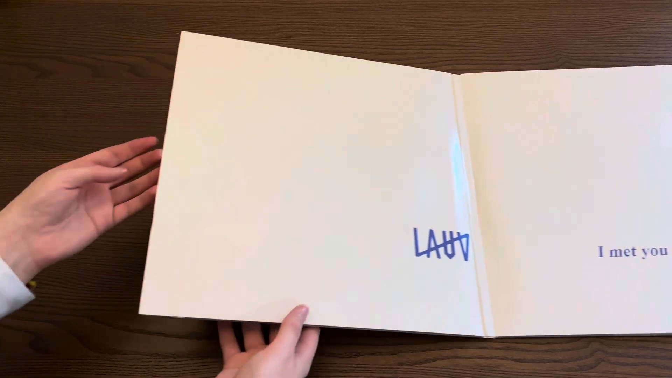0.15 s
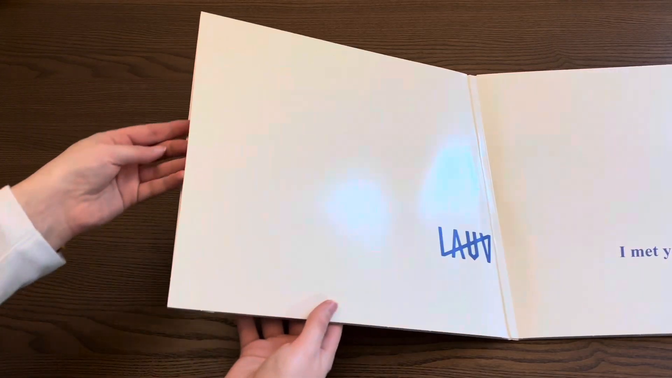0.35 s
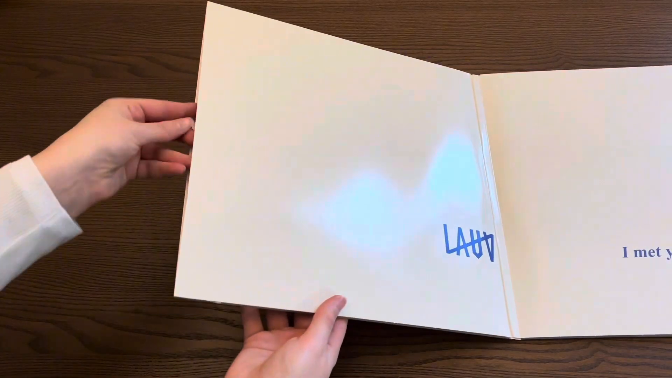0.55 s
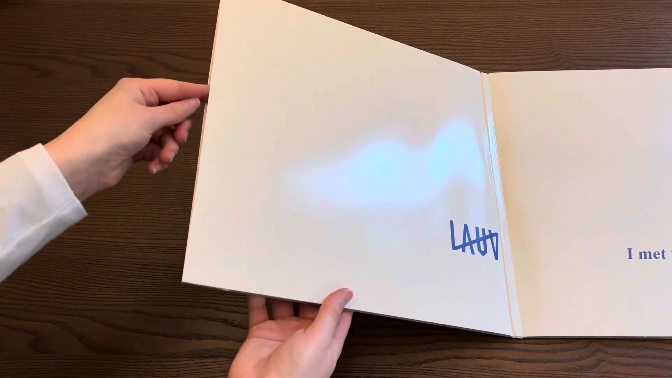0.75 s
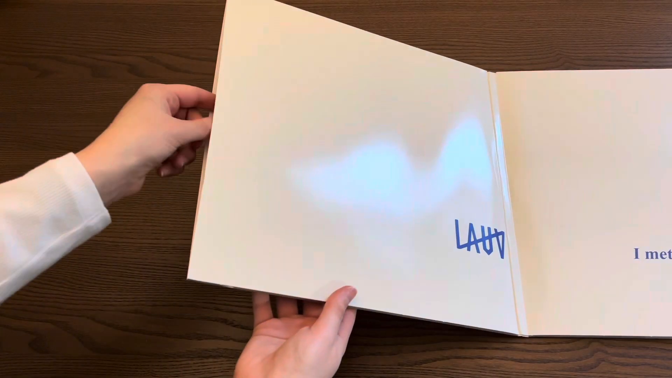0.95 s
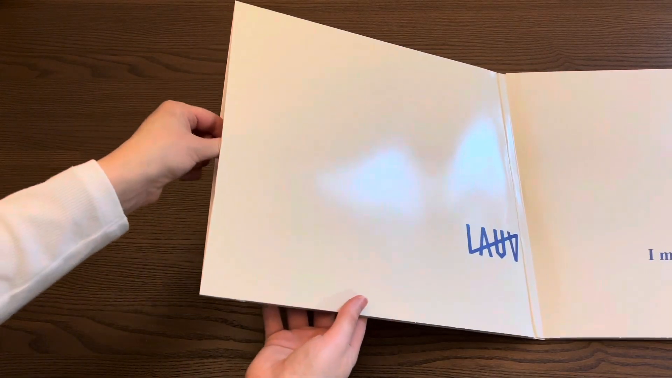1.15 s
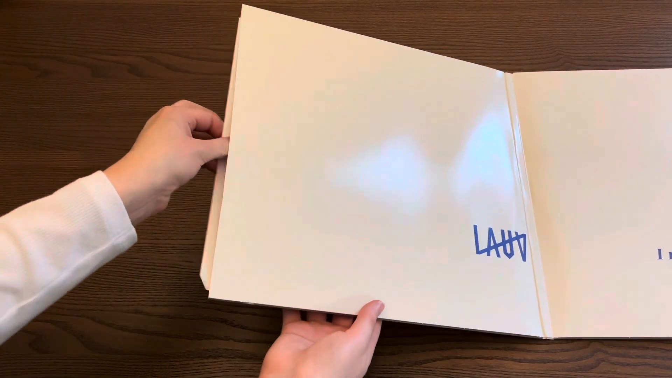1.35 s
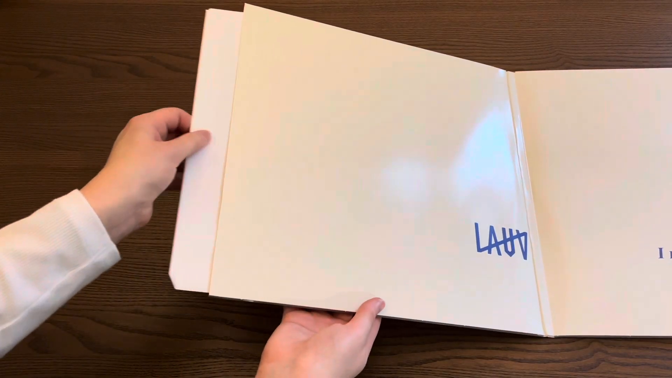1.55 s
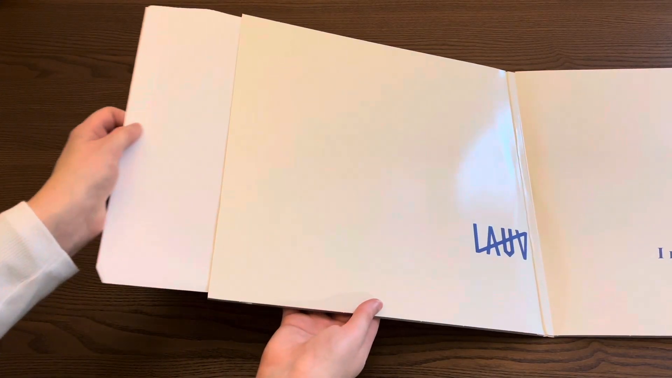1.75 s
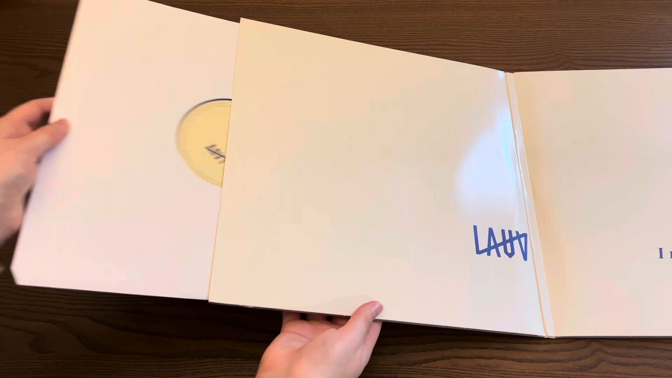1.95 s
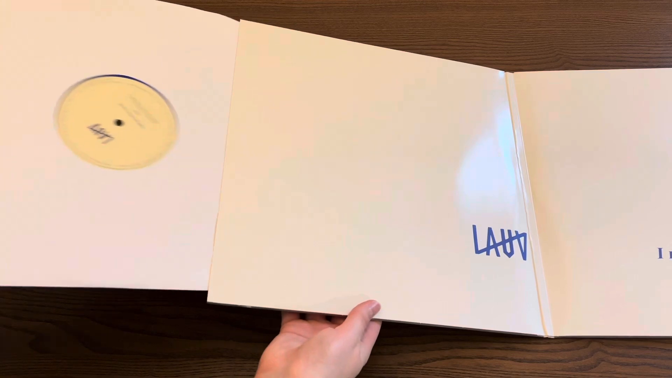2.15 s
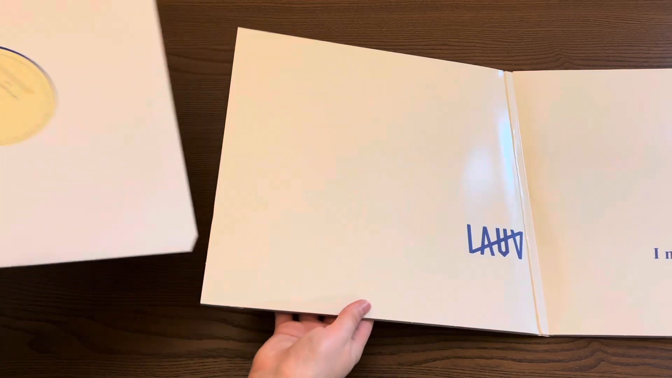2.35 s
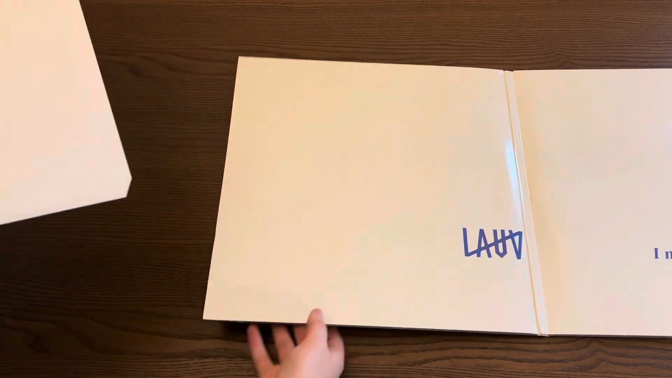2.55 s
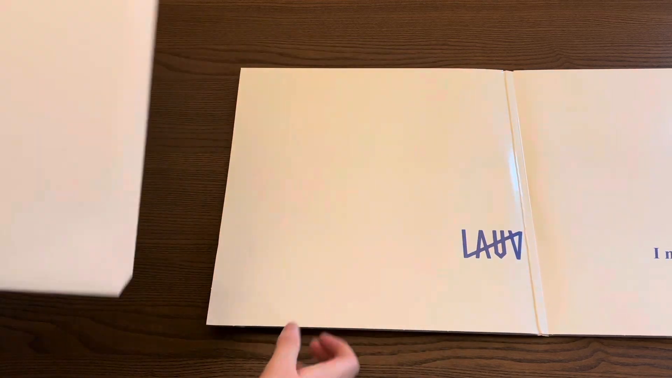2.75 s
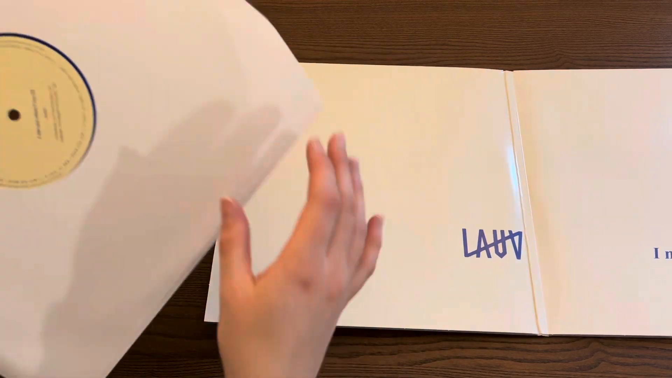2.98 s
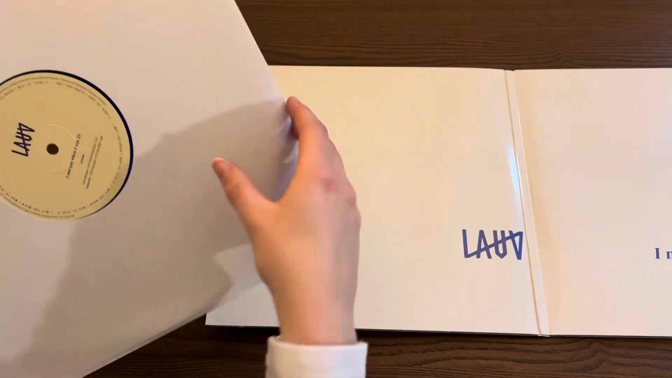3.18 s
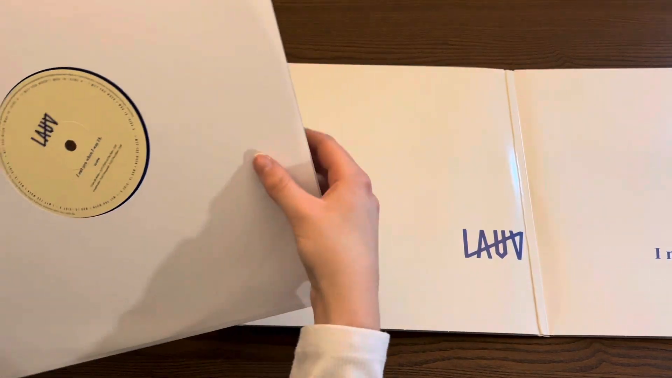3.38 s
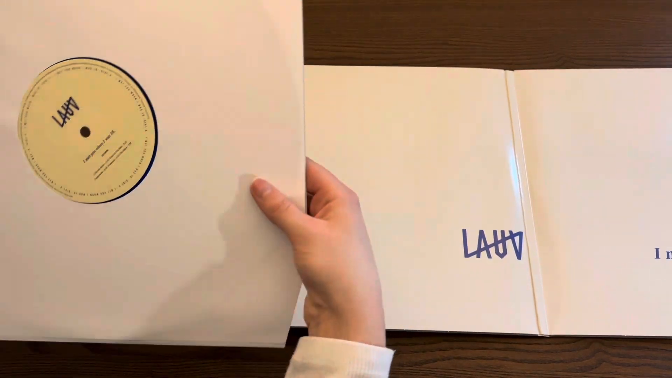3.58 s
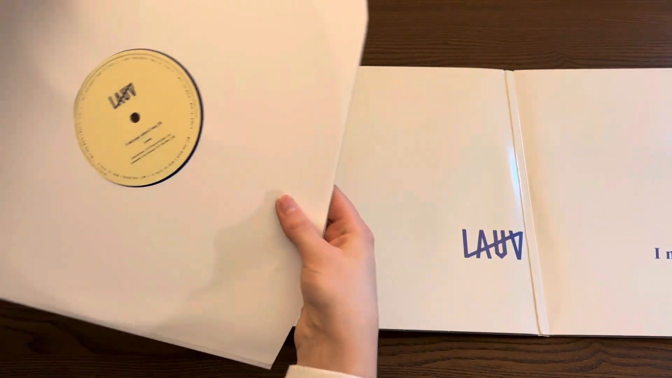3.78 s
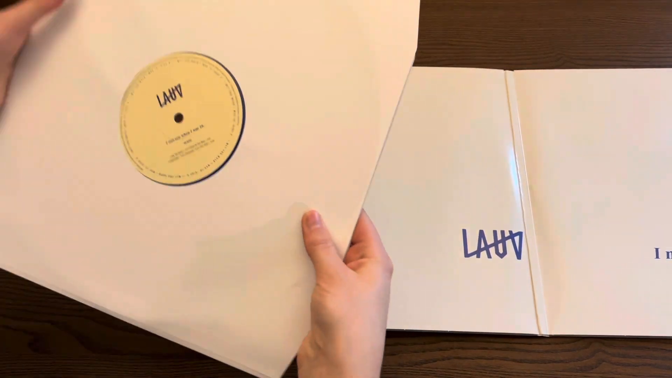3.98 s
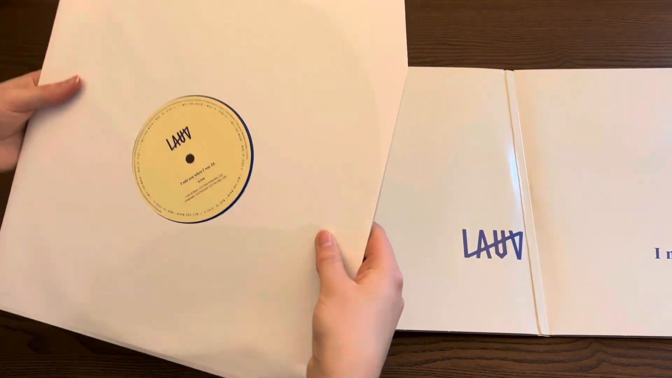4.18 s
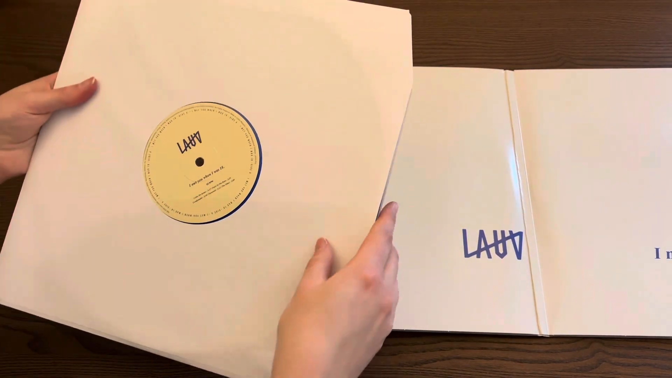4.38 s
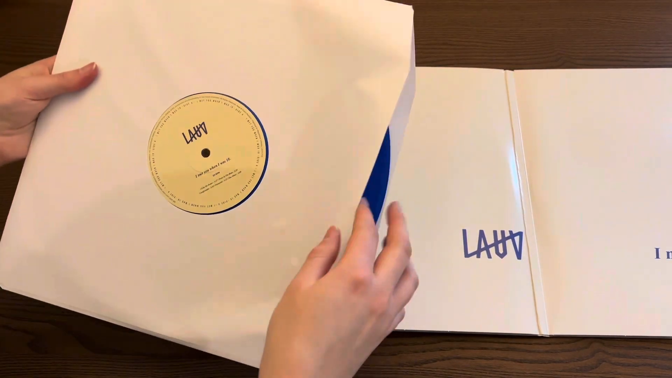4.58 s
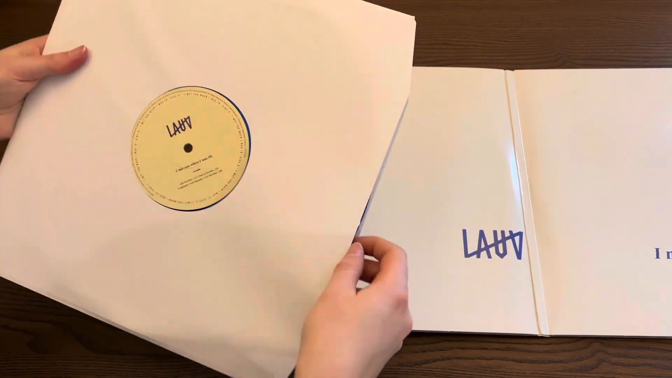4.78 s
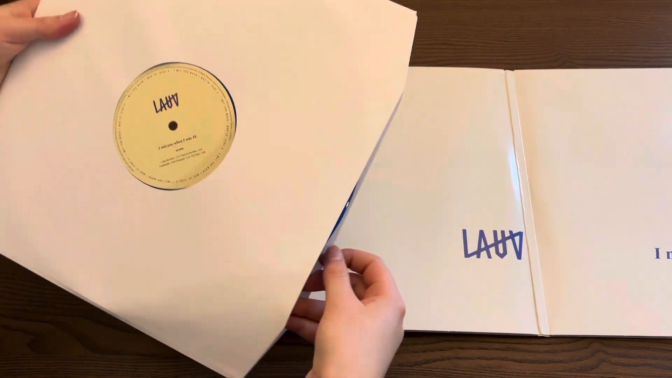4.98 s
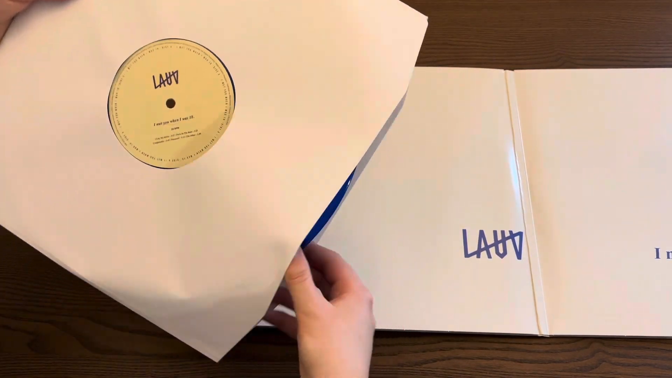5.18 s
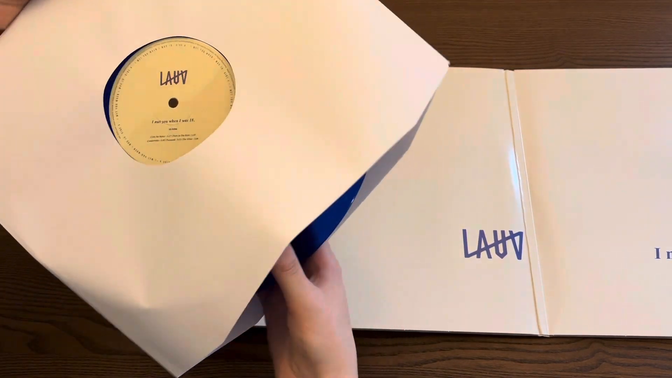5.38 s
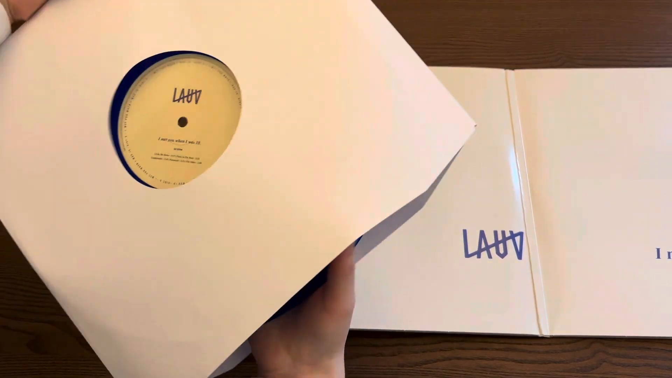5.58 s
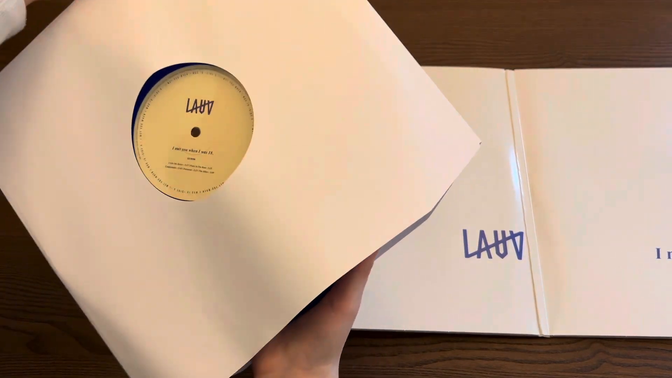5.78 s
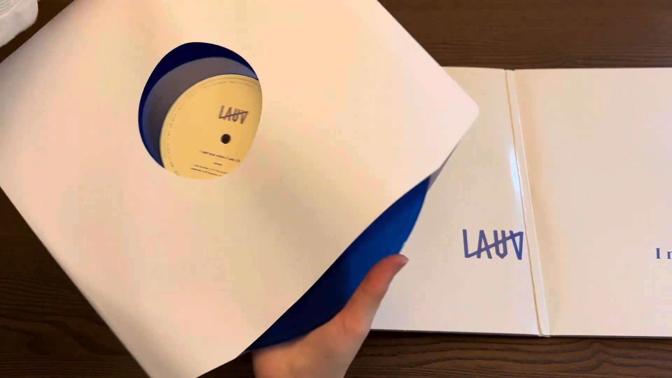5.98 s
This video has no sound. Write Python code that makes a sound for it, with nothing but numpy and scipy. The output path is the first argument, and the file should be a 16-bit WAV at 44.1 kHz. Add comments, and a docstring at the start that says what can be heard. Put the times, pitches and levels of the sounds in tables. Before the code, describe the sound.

Paper slides against cardboard and crackles softly, with a few dull bumps, as a vinyl record is unpacked in a quiet room.

```python
"""Quiet room, wooden table: hands pull a record in its paper sleeve from a cardboard jacket, turn it
and open the sleeve. Paper rubs on card and skin as fibres catch and let go; fingertips squeak faintly.
Creases snap, the air pocket in the sleeve pops low, and jacket and table take soft thumps.
At the end the disc slides over the paper."""
import sys
import numpy as np
from scipy import signal
from scipy.fft import rfft, irfft, next_fast_len
from scipy.io import wavfile

SR = 44100
rng = np.random.default_rng(int(sys.argv[2]) if len(sys.argv) > 2 else 0)


def generate_wav(sig):
    """Save sig (samples, or channels by samples) to the path in sys.argv[1] as 16-bit PCM at SR."""
    pcm = np.round(np.clip(np.atleast_2d(sig).T, -1, 1) * 32767).astype(np.int16)
    wavfile.write(sys.argv[1], SR, pcm)


N = 265822

# room air spectrum: f/Hz, relative density/dB
ROOM_SPECTRUM = [(20, -56), (40, -2.5), (75, 3.5), (110, -9.5), (150, -10.5), (210, -8.5), (300, -21),
                 (500, -19.5), (1300, -15.5), (2200, -28), (5000, -34), (16000, -38.5)]
# skin or paper over paper: t/s at full pressure, hold/s, rise/s, fade/s,
# fine fibres/dB, coarse fibres/dB, hiss/dB, pocket/dB
RUB_STROKES = [(0.01, 0.084, 0.14, 0.2, -50, -56, -69, -65.5),
               (0.16, 0.066, 0.063, 0.26, -64, -61.5, -78, -76),
               (0.504, 0.14, 0.019, 0.077, -74, -72, -83, -106),
               (0.825, 0.09, 0.074, 0.17, -66, -63.5, -80, -73),
               (0.992, 0.027, 0.099, 0.35, -63.5, -61, -76, -77),
               (2.589, 0.048, 0.032, 0.075, -76.5, -70.5, -83, -84),
               (2.708, 0.081, 0.024, 0.04, -69, -71, -73.5, -69),
               (3.23, 0.0095, 0.082, 0.094, -40.5, -45.5, -57.5, -53.5),
               (3.495, 0.017, 0.12, 0.13, -64, -62, -70.5, -67.5),
               (3.626, 0.029, 0.14, 0.086, -73, -74, -70, -70),
               (3.838, 0.069, .02, 0.056, -64.5, -70.5, -64.5, -65.5),
               (3.962, 0.038, 0.045, 0.065, -61.5, -74, -63, -82),
               (4.058, 0.013, 0.0036, 0.8, -72.5, -72, -71.5, -66),
               (4.236, 0.11, 0.079, 0.15, -53.5, -59.5, -64.5, -70.5),
               (4.316, 0.0036, 0.0085, 0.023, -42, -45.5, -52, -48.5),
               (4.433, 0.11, 0.021, 0.11, -50, -61, -64, -64.5),
               (4.684, 0.019, 0.12, 0.092, -50.5, -51.5, -71, -64),
               (4.732, 0.081, .08, 0.17, -68.5, -57, -75.5, -62),
               (4.944, 0.0074, 0.039, 0.068, -58.5, -48, -69.5, -71),
               (5.233, 0.071, 0.28, 0.42, -60, -57.5, -72, -61),
               (5.4, 0.047, 0.22, 0.36, -53, -51, -62.5, -71),
               (5.593, 0.023, 0.069, 0.23, -52, -45.5, -69, -51),
               (5.906, .2, 0.14, .1, -45.5, -50, -58, -58.5)]
# rubbing colour: f/Hz, gain/dB
FIBRE_COLOUR = [(600, -28), (760, -0.5), (1000, -3.5), (1500, -4.5), (3000, -3), (6500, -4.5), (9000, -0.5),
                (15500, -5.5)]
# air pocket in the sleeve: f/Hz, width/Hz, gain/dB
POCKET_MODES = [(191, 106, -11), (419.5, 73, 1.5), (528, 79, 2.5), (572, 84, 1)]
# creases: t/s, crease peak/dB, centre f/Hz, pop peak/dB, crack peak/dB, t60/s
CREASE_SNAPS = [(0.578, -56.5, 2120, -54.5, -65, 0.25), (0.688, -57, 2000, -53.5, -70, 0.03),
                (0.696, -51, 2160, -58, -66, 0.15), (0.715, -46.5, 890, -51.5, -70, 0.038),
                (0.735, -49, 1700, -46, -49.5, 0.005), (0.786, -52, 2280, -51, -68, 0.029),
                (0.812, -42, 2220, -46, -53, 0.022), (1.006, -46, 1850, -74, -73, 0.11),
                (1.215, -52, 2220, -52, -62, 0.096), (2.821, -63, 920, -51.5, -82, 0.065),
                (3.052, -52.5, 1090, -47.5, -91, 0.037), (3.132, -46.5, 1000, -51, -55, 0.048),
                (3.144, -33, 1320, -45, -66, 0.018), (3.161, -37.5, 1350, -36.5, -38, 0.064),
                (3.213, -36, 1290, -42.5, -46, 0.033), (3.222, -32.5, 1550, -43, -27, 0.036),
                (3.249, -30, 1240, -34, -54, 0.017), (3.28, -43, 1150, -39.5, -66, 0.039),
                (3.493, -55, 1600, -48, -70, 0.086), (3.517, -54, 1370, -47.5, -60, 0.034),
                (3.819, -58, 2000, -50, -55, 0.14), (4.155, -43, 1370, -45.5, -62, 0.055),
                (4.216, -48, 1610, -54, -50, 0.04), (4.267, -42, 2010, -45.5, -45, 0.035),
                (4.321, -32.5, 3640, -44.5, -39, 0.061), (4.506, -49.5, 1580, -46.5, -45, 0.076),
                (4.594, -41, 2040, -44, -85, 0.076), (4.648, -24.5, 2470, -39.5, -49, 0.026),
                (4.655, -30, 1290, -43, -60, 0.021), (4.666, -38.5, 3000, -46, -62, 0.047),
                (4.756, -36.5, 2240, -39.5, -55, 0.052), (4.814, -49.5, 1610, -42, -73, 0.069),
                (4.94, -28, 2110, -35.5, -47, 0.022), (5.18, -32.5, 2050, -37.5, -63, 0.04),
                (5.279, -45.5, 1090, -44, -55, 0.087), (5.536, -30, 1940, -43, -63, 0.035),
                (5.544, -33.5, 2050, -41, -61, 0.02), (5.55, -29.5, 1460, -65, -60, 0.063),
                (5.6, -29.5, 2560, -59, -41, 0.13), (5.614, -32.5, 1610, -40, -60, 0.032),
                (5.841, -39, 1910, -66, -63, 0.039), (5.856, -40, 990, -41.5, -66, 0.014),
                (5.922, -41, 2270, -37, -58, 0.13)]
# broad modes of the paper: f/Hz, gain/dB
SHEET_MODES = [(900, 8.5), (1270, 8.5), (1690, 3.5), (2160, 1.5), (2625, 2.5), (3300, 2), (4200, 7)]
# skin on paper: t/s, length/s, f/Hz, level/dB
FINGER_SQUEAKS = [(0.611, .006, 1680, -66), (1.803, 0.016, 1175, -52), (2.633, 0.038, 1750, -75),
                  (2.735, 0.063, 2810, -72), (4.44, 0.022, 1690, -60), (4.497, 0.037, 1764, -60.5),
                  (4.948, 0.032, 2200, -55.5)]
# pushes on jacket and table: t/s, gain/dB, f/Hz
TABLE_THUMPS = [(0.831, -42.5, 63.5), (2.554, -38, 87), (2.768, -42.5, 88), (3.138, -42.5, 106),
                (3.241, -32.5, 157), (3.303, -35, 55), (3.495, -38, 54.3), (4.109, -42, 95),
                (4.172, -42, 64.4), (4.757, -41, 118), (4.934, -52, 151), (5.181, -43, 85), (5.59, -31, 80),
                (5.868, -46, 114)]
# sleeve leaving the jacket: t/s, fine fibres/dB, hiss/dB, jacket air/dB
PULL_LEVELS = [(1.15, -73, -85.5, -67.5), (1.22, -63.5, -84, -65.5), (1.36, -49.5, -64, -62.5),
               (1.46, -55, -72, -59), (1.57, -46, -59, -64.5), (1.73, -46, -58.5, -62.5),
               (1.86, -47.5, -60.5, -64.5), (2.09, -42, -50.5, -59.5), (2.19, -45.5, -48, -57.5),
               (2.31, -58, -58, -61.5), (2.4, -79, -81.5, -76.5), (2.53, -100, -100, -89)]
# air in the jacket: f/Hz, width/Hz, gain/dB
JACKET_AIR_MODES = [(480, 97, -0.5), (510, 29, 1.5), (548, 47, -1.5), (960, 57, -7)]
# rubbed card: f/Hz, width/Hz, gain/dB
BOARD_MODES = [(2330, 580, -0.5), (3170, 400, 1), (4950, 200, -5)]
# disc on paper: f/Hz, width/Hz, gain/dB
DISC_MODES = [(1340, 78, -4.5), (2067, 300, -2.5), (2410, 160, -0.5), (2880, 56, 3.5)]
# disc sliding: t/s, level/dB
DISC_LEVELS = [(5.8, -82), (5.85, -57), (5.95, -43.5), (6.03, -53)]
# microphone pair: f/Hz, left-right correlation
PAIR_CORRELATION = [(60, .94), (420, .9), (650, .55), (2500, .55), (4500, .1), (7000, .3), (8500, -.3),
                    (9200, -.998), (10400, -.998), (11500, .998), (14000, .998), (14800, -.998)]
# left ahead of right: f/Hz, phase/rad
LEFT_PHASE = [(60, .16), (420, .8), (690, 2.0), (1100, 2.3), (1800, .6), (2500, .9), (3500, 2.6), (6500, 0)]
# left over right: f/Hz, level/dB
LEFT_BALANCE = [(60, 0.5), (150, 5.5), (380, 2.5), (950, 4.5), (2380, 1.5), (5980, 3.5), (15000, 1)]

ROOM_TONE_DB, REVERB_DB, REVERB_T60_S = -70.5, -14, .2
STROKE_SWING_DB = 20   # fine fibres: drop per rise or fade time
POCKET_FOLLOWS, COARSE_FOLLOWS, HISS_FOLLOWS = 0.71, 0.93, 0.83   # shares of that swing
PULL_FULL_DB, PULL_COARSE_DB, PULL_COARSE_FOLLOWS = -46.5, -53, 0.67   # fine, coarse at full pull; slope
BOARD_DB = -11   # relative to the fine fibres
RUSTLE_T60_S = 0.43   # sheet settling after a snap
POCKET_SPREAD = 0.034   # relative pitch spread between grips
SQUEAK_WIDTH_HZ, SQUEAK_EDGE_S = 110, .008
THUMP_T60_S = 0.095
STOPBAND_HZ = 16150


def from_db(db):
    return 10 ** (np.asarray(db) / 20)


def unit_rms(x):
    return x / np.sqrt(np.mean(x ** 2) + 1e-20)


def level_curves(rows):
    """Each dB column per sample; silent outside the rows."""
    times_s, *columns = np.transpose(rows)
    return [np.interp(np.arange(N) / SR, times_s, db, left=-120, right=-120) for db in columns]


def at_hz(points, hz):
    points_hz, values = np.transpose(points)
    return np.interp(np.log(hz), np.log(points_hz), values)


def drift(corner_hz):
    """Slow random wander, rms 1."""
    pole = np.exp(-2 * np.pi * corner_hz * 40 / SR)
    slow = signal.lfilter([1], [1, -2 * pole, pole * pole], rng.standard_normal(N // 40 + 2002))[2000:]
    return np.interp(np.arange(N) / 40, np.arange(len(slow)), unit_rms(slow))


def resonance(x, hz, width_hz):
    """Two-pole peak, gain 1."""
    r = np.exp(-np.pi * max(width_hz, 5) / SR)
    gain = (1 - r * r) / 2
    return signal.lfilter([gain, 0, -gain], [1, -2 * r * np.cos(2 * np.pi * hz / SR), r * r], x)


def body(x, modes):
    """A solid or an air pocket colours what drives it."""
    return sum((-1) ** k * from_db(db) * resonance(x, hz, width_hz)
               for k, (hz, width_hz, db) in enumerate(modes))


def catches(per_s, spread_db):
    """Fibres catch and let go: uneven clicks, two independent channels, rms 1."""
    sizes = from_db(spread_db * np.minimum(rng.exponential(1, (2, N)), 5))
    signs = rng.choice([-1, 1], (2, N))
    return unit_rms(sizes * signs * (rng.random((2, N)) < per_s / SR))


def room_tone():
    """Steady room air, wavering a little."""
    hz = np.maximum(np.fft.rfftfreq(N, 1 / SR), 1)
    air = irfft(rfft(rng.standard_normal((2, N))) * from_db(at_hz(ROOM_SPECTRUM, hz)), N)
    return from_db(ROOM_TONE_DB + 2.5 * drift(9)) * unit_rms(air)


def rub_levels_db():
    """Pocket, coarse, fine and hiss levels: strokes rise, hold and fade; the pull adds its power."""
    hop = 32
    t = np.arange(0, N + hop, hop) / SR
    stroke_power = np.zeros((4, len(t)))
    swing_db = STROKE_SWING_DB * np.array([[POCKET_FOLLOWS], [COARSE_FOLLOWS], [1], [HISS_FOLLOWS]])
    for at_s, hold_s, rise_s, fade_s, fine_db, coarse_db, hiss_db, pocket_db in RUB_STROKES:
        before = np.maximum(at_s - t, 0) / max(rise_s, .004)
        after = np.maximum(t - at_s - hold_s, 0) / fade_s
        full_db = np.c_[[pocket_db, coarse_db, fine_db, hiss_db]]
        stroke_power += from_db(full_db - swing_db * (before + after)) ** 2
    fine_db, hiss_db, _ = level_curves(PULL_LEVELS)
    coarse_db = PULL_COARSE_DB + PULL_COARSE_FOLLOWS * (fine_db - PULL_FULL_DB)
    return [10 * np.log10(np.interp(np.arange(N) / SR, t, power) + from_db(pull_db) ** 2)
            for power, pull_db in zip(stroke_power, [-120, coarse_db, fine_db, hiss_db])]


def rubbing(patchy_db, pressure_db):
    """Fibres catch in third-octave bands; the loose paper wall pumps the pocket unevenly."""
    levels_db = rub_levels_db()
    density_db = [db - 10 * np.log10(width_hz)
                  for db, width_hz in zip(levels_db, (320, 1500, 3000, 2500))]
    streams = [catches(9000, 0.38), catches(9000, 1.6)]
    pressure = drift(44)
    edges_hz = 600 * 2 ** np.arange(0, 4.9, 1 / 3)
    fibres = 0
    for k, (low_hz, high_hz) in enumerate(zip(edges_hz, edges_hz[1:])):
        hz = np.sqrt(low_hz * high_hz)
        # blend of two neighbours: 0 pocket, 1 coarse, 2 fine, 3 hiss
        blend = np.interp(np.log(hz), np.log([600, 1500, 2700, 4600, 9500]), [.6, 1.1, 1.4, 2.0, 3.0])
        lower = min(int(blend), 2)
        band_db = density_db[lower] + (blend - lower) * (density_db[lower + 1] - density_db[lower])
        gain = from_db(band_db + at_hz(FIBRE_COLOUR, hz)
                       + pressure_db * pressure + patchy_db * drift(16.4))
        band = signal.butter(2, [low_hz, high_hz], "band", fs=SR, output="sos")
        fibres += gain * signal.sosfilt(band, streams[k % 2])
    low_cut = signal.butter(1, 330, "high", fs=SR, output="sos")
    flutter = unit_rms(signal.sosfilt(low_cut, body(catches(500, 4.3), POCKET_MODES)))
    return np.sqrt(SR / 2) * fibres + from_db(levels_db[0] + 3.3 * drift(20)) * flutter


def crease_snaps():
    """A crease gives way and shakes the sheet modes near its centre frequency; the pocket pops."""
    size = 6000
    out, t = np.zeros((2, N + size)), np.arange(size) / SR
    treble = signal.butter(2, [2600, 9000], "band", fs=SR, output="sos")
    for at_s, crease_db, centre_hz, pop_db, crack_db, t60_s in CREASE_SNAPS:
        noise = rng.standard_normal((3, 2, size))
        scatter_db = 2 * rng.standard_normal(len(SHEET_MODES))
        noise *= from_db(2.3 * rng.standard_normal(size // 20 + 1).repeat(20)[:size])   # uneven parting
        noise[:, :, 12] = 3.5   # first break: one sharp click
        attack = (1 - np.exp(-t / 0.000078)) ** 2
        envelope = attack * (from_db(-60 * t / t60_s) + 0.062 * from_db(-60 * t / RUSTLE_T60_S))
        sheet = [(hz, 0.12 * hz, db + scatter_db[k] - 18.2 * np.log2(hz / centre_hz) ** 2)
                 for k, (hz, db) in enumerate(SHEET_MODES)]
        crease = signal.lfilter([1], [1, -.6], body(noise[0] * envelope, sheet))   # soft paper: dull top
        pocket = np.array(POCKET_MODES) * [1 + POCKET_SPREAD * rng.standard_normal(), 1.3, 1]
        pocket[:, 2] += 3 * rng.standard_normal(len(pocket))   # each grip favours other modes
        pop = body(noise[1] * envelope ** 0.97, pocket)
        crack = signal.sosfilt(treble, noise[2] * envelope ** 2)   # treble dies first
        start = round(at_s * SR)
        for part, db in ((crease, crease_db), (pop, pop_db), (crack, crack_db)):
            peak = np.sqrt(np.mean(np.max(part ** 2, axis=1)))
            out[:, start:start + size] += from_db(db) * part / peak
    return out[:, :N]


def reverb(x):
    """Table and walls add a short dull tail."""
    t = np.arange(SR // 2) / SR
    tail = rng.standard_normal((2, len(t))) * from_db(-60 * t / REVERB_T60_S) * (t > .004)
    tail = signal.lfilter([1], [1, -.5], tail)
    tail /= np.sqrt(np.sum(tail[0] ** 2))
    return x + from_db(REVERB_DB) * signal.fftconvolve(x, tail, axes=1)[:, :N]


def finger_squeaks():
    """Fingertip stick-slip briefly rings one narrow resonance."""
    out, t = 0, np.arange(N) / SR
    slips = catches(3300, 2.0)
    for at_s, length_s, hz, db in FINGER_SQUEAKS:
        outside_s = np.maximum(at_s - t, 0) + np.maximum(t - at_s - length_s, 0)
        tone = resonance(resonance(slips, hz, SQUEAK_WIDTH_HZ), hz, 2 * SQUEAK_WIDTH_HZ)
        out += from_db(db) * np.exp(-outside_s / SQUEAK_EDGE_S) * unit_rms(tone)
    return out


def table_thumps():
    """A soft push swells, then rings out as a low mode with a brief overtone."""
    out, t = np.zeros(N + SR), np.arange(SR // 2) / SR
    envelope = (1 - np.exp(-t / 0.019)) * from_db(-60 * t / THUMP_T60_S)
    for at_s, db, hz in TABLE_THUMPS:
        start = round(at_s * SR)
        overtone = 0.37 * np.exp(-t / 0.035) * np.sin(2 * np.pi * 2.3 * hz * t)
        out[start:start + len(t)] += from_db(db) * envelope * (np.sin(2 * np.pi * hz * t) + overtone)
    return out[:N] * [[1], [.3]]   # mostly mid


def jacket_scrape():
    """The sleeve pumps the jacket's air and scrapes its board."""
    fine_db, _, air_db = level_curves(PULL_LEVELS)
    board_db = np.minimum(fine_db, PULL_FULL_DB) + BOARD_DB
    air = from_db(air_db + 0.42 * drift(22)) * unit_rms(body(catches(160, 3.7), JACKET_AIR_MODES))
    board = from_db(board_db + 3.6 * drift(15)) * unit_rms(body(catches(3000, 2.8), BOARD_MODES))
    return air + board


def disc_slide():
    """The disc slides over catching paper fibres."""
    disc_db, = level_curves(DISC_LEVELS)
    return from_db(disc_db + 0.76 * drift(30)) * unit_rms(body(catches(3000, 2.2), DISC_MODES))


def scene():
    """Mid and side of the sound field: same gestures, independent noise."""
    friction = rubbing(patchy_db=1.9, pressure_db=0.5) + jacket_scrape() + disc_slide() + finger_squeaks()
    return friction + reverb(crease_snaps()) + table_thumps() + room_tone()


def record(dry):
    """Microphone pair: mid and side to left and right; correlation, level, phase per band; top cut."""
    size = next_fast_len(N + 4096)
    hz = np.maximum(np.fft.rfftfreq(size, 1 / SR), 1)
    correlation = np.interp(hz, *np.transpose(PAIR_CORRELATION))
    mid, side = rfft(dry, size) * np.sqrt([1 + correlation, 1 - correlation])
    lean = from_db(at_hz(LEFT_BALANCE, hz) / 2) * np.exp(.5j * at_hz(LEFT_PHASE, hz))
    pair = irfft(np.array([(mid + side) * lean, (mid - side) / lean]), size)[:, :N]
    return signal.sosfilt(signal.cheby2(16, 70, STOPBAND_HZ, fs=SR, output="sos"), pair)


dry = scene()
out = record(dry)
generate_wav(out)
```